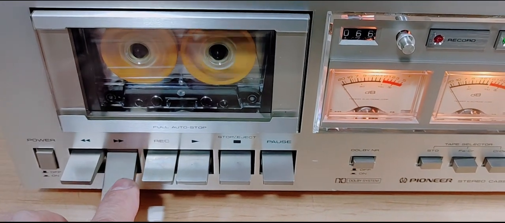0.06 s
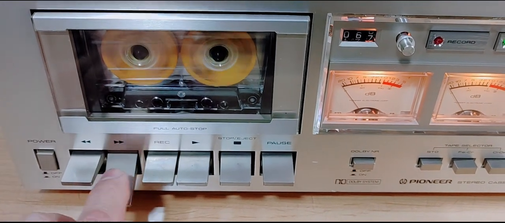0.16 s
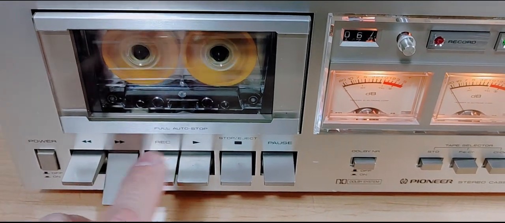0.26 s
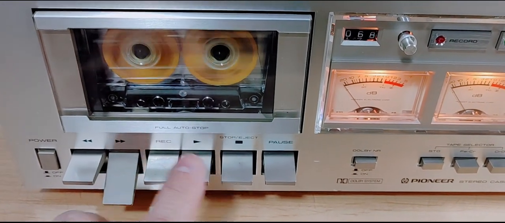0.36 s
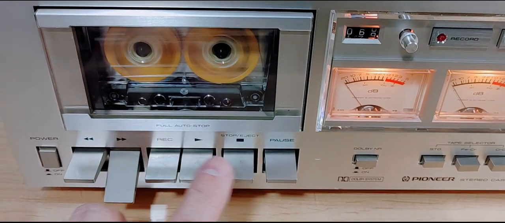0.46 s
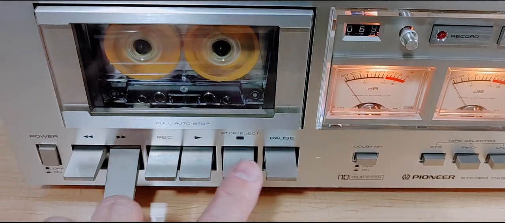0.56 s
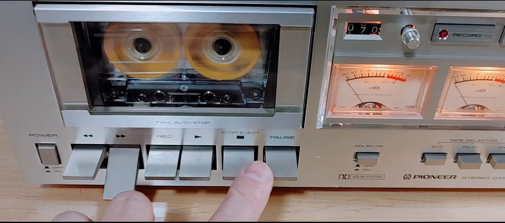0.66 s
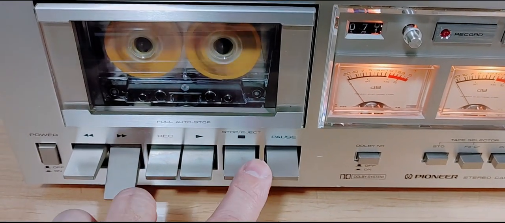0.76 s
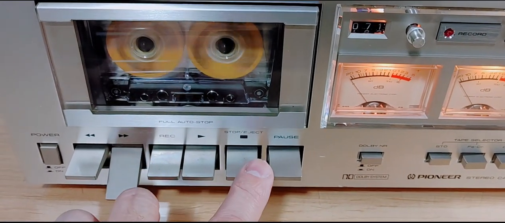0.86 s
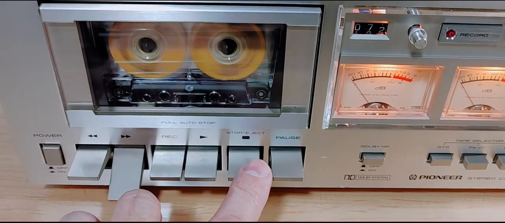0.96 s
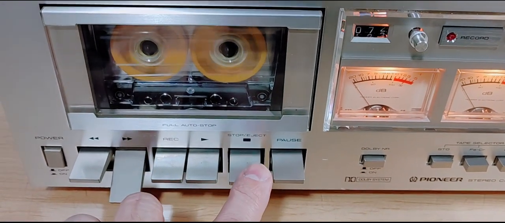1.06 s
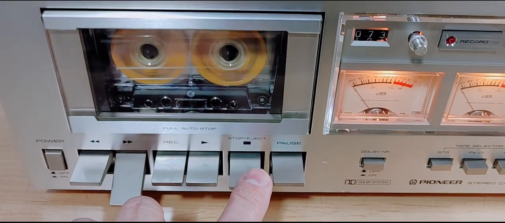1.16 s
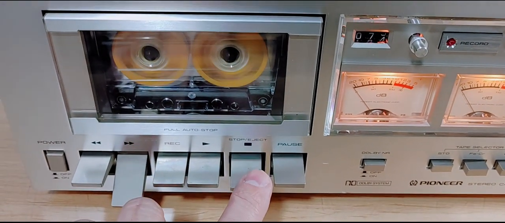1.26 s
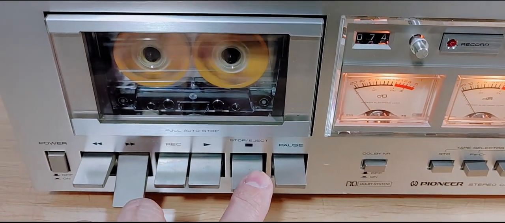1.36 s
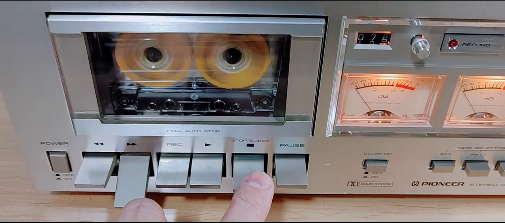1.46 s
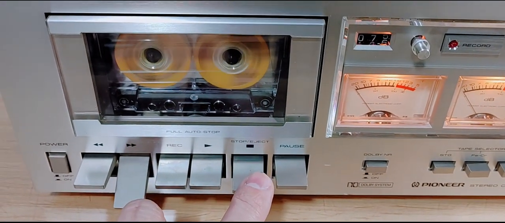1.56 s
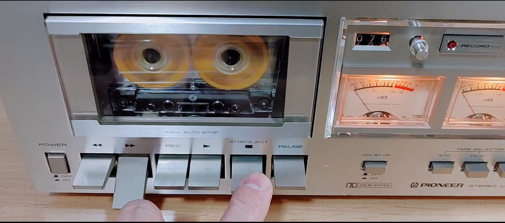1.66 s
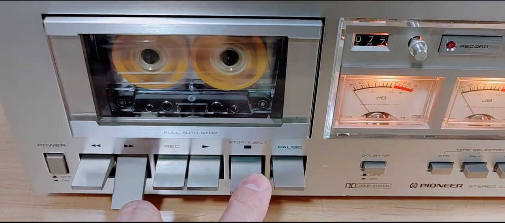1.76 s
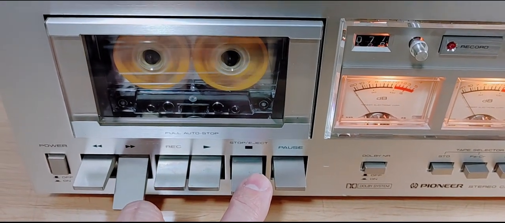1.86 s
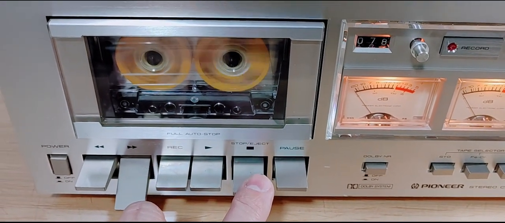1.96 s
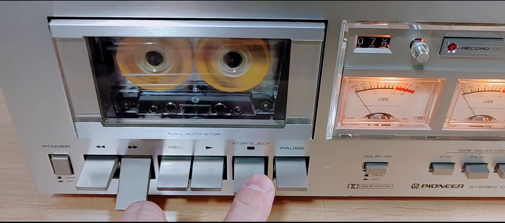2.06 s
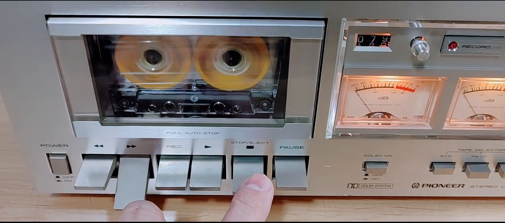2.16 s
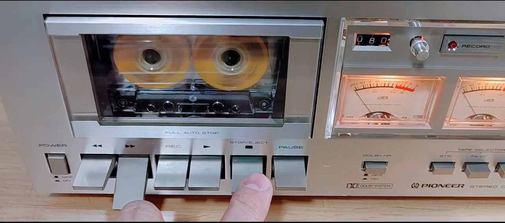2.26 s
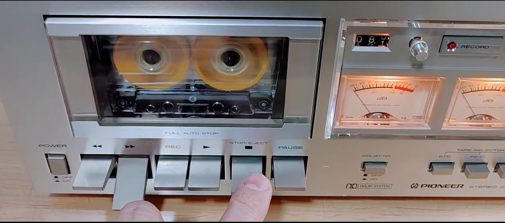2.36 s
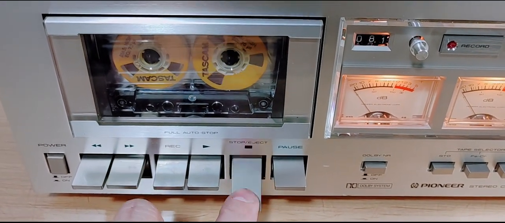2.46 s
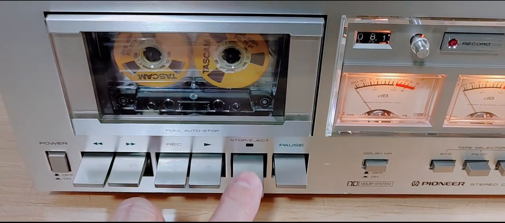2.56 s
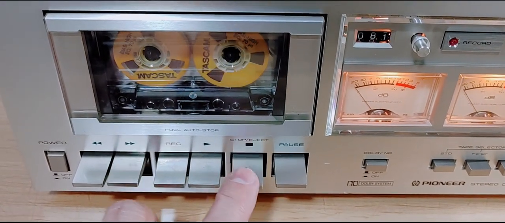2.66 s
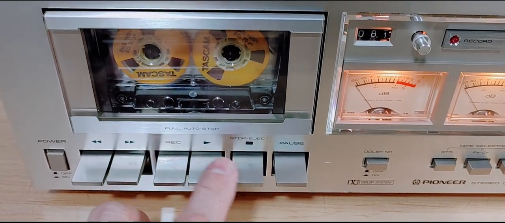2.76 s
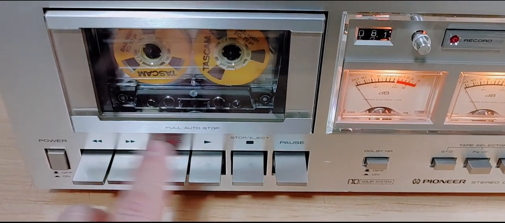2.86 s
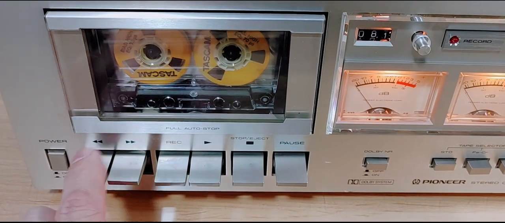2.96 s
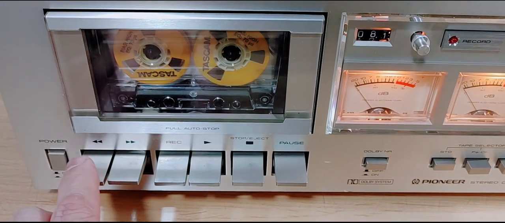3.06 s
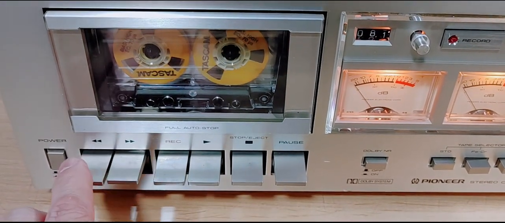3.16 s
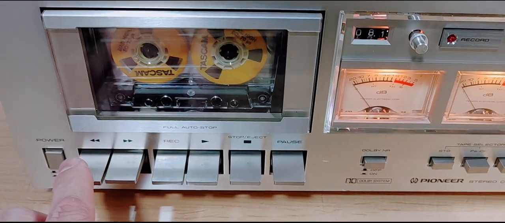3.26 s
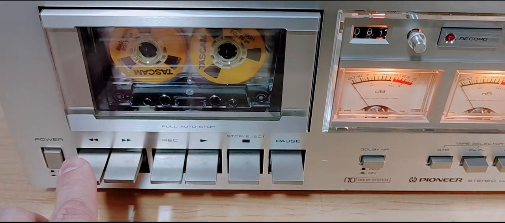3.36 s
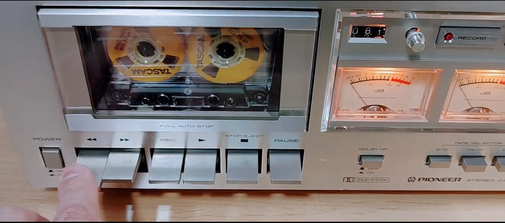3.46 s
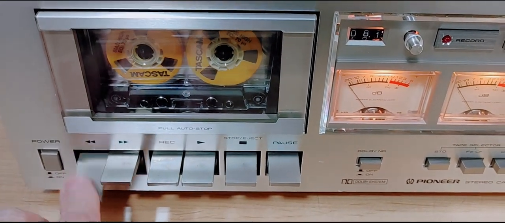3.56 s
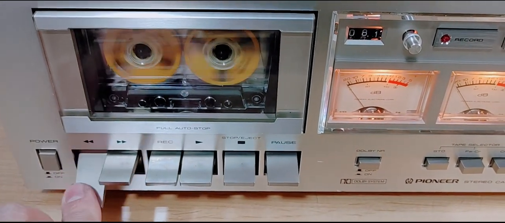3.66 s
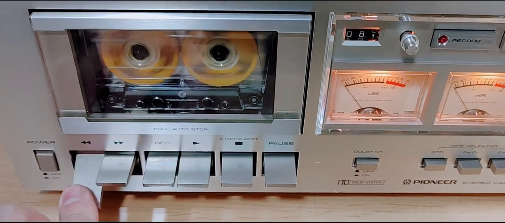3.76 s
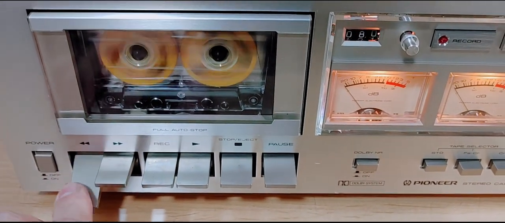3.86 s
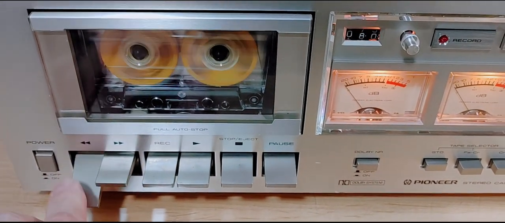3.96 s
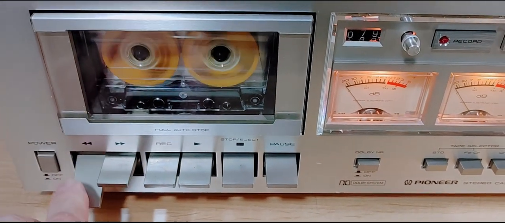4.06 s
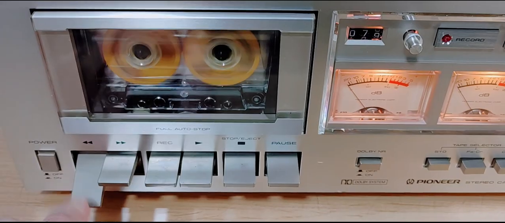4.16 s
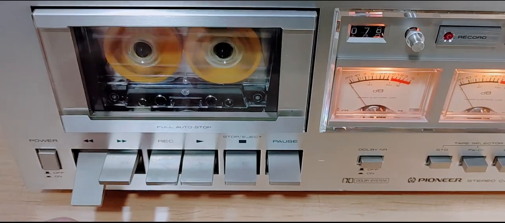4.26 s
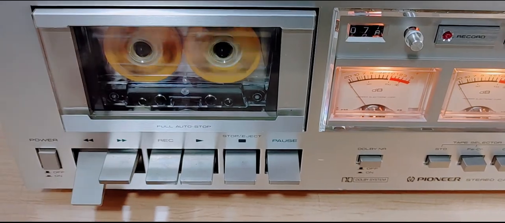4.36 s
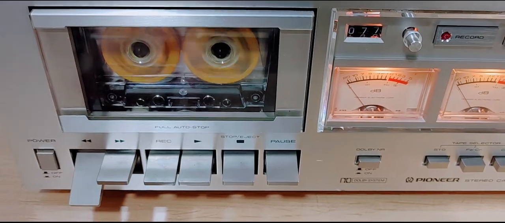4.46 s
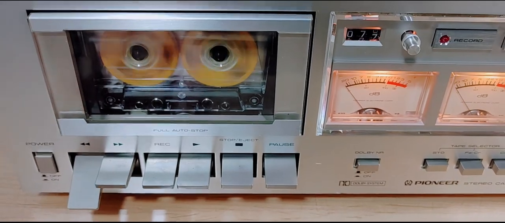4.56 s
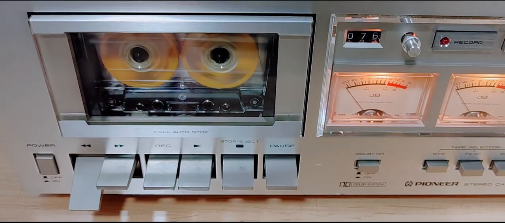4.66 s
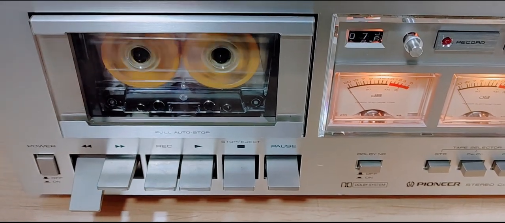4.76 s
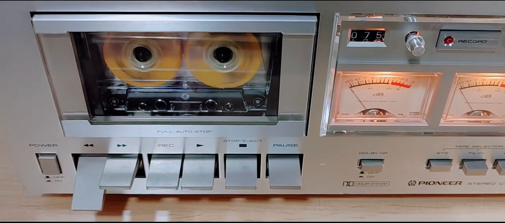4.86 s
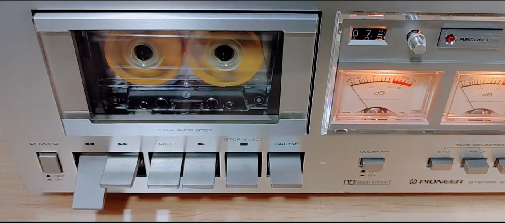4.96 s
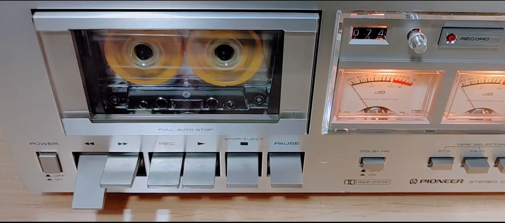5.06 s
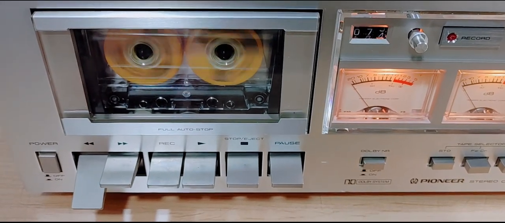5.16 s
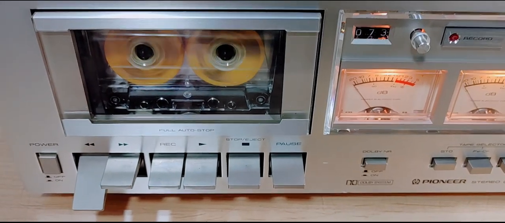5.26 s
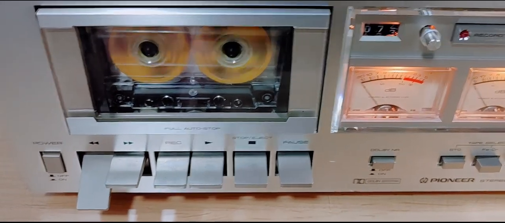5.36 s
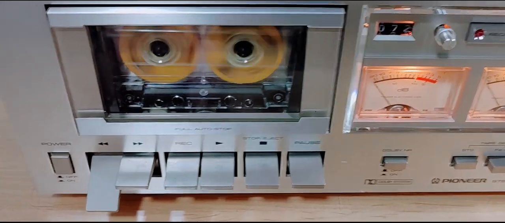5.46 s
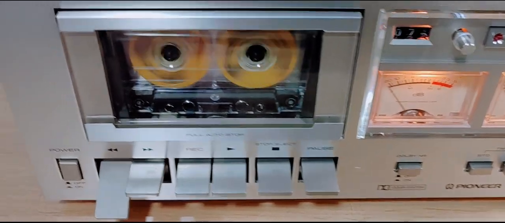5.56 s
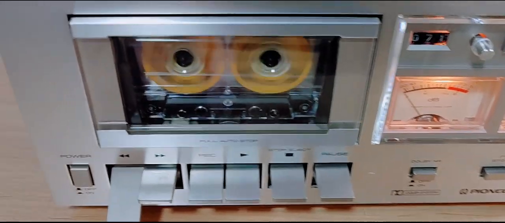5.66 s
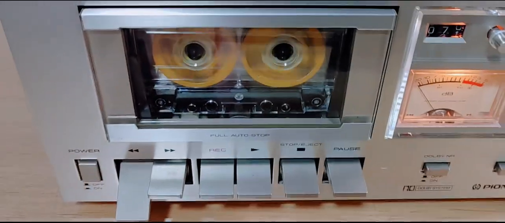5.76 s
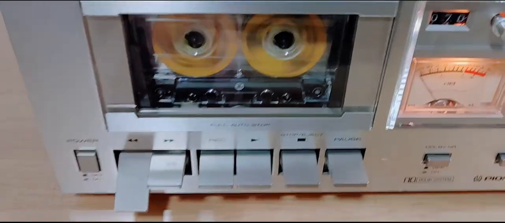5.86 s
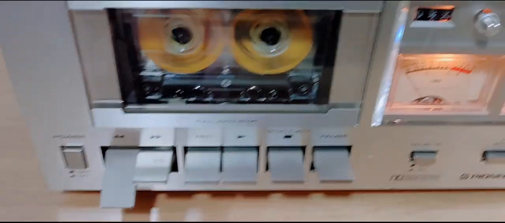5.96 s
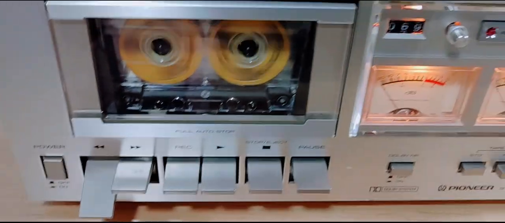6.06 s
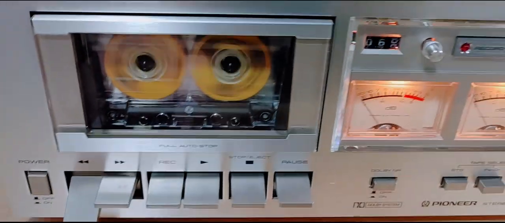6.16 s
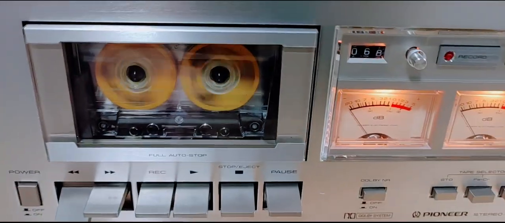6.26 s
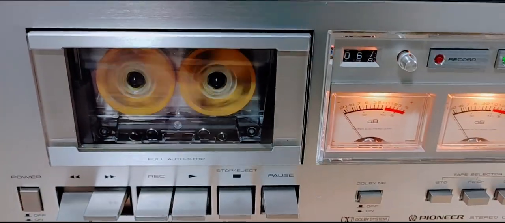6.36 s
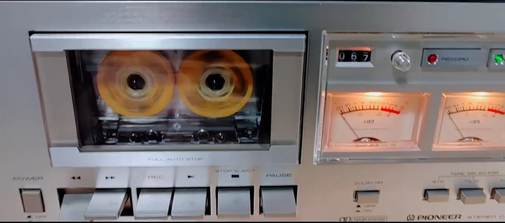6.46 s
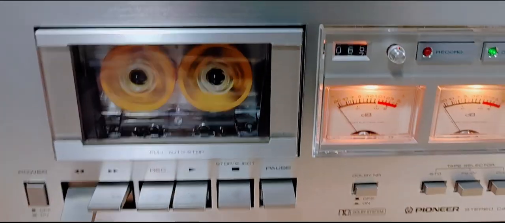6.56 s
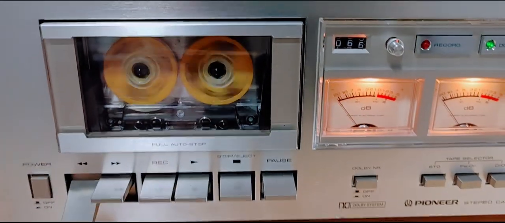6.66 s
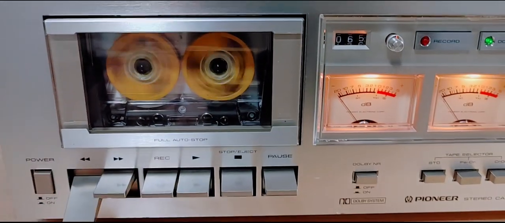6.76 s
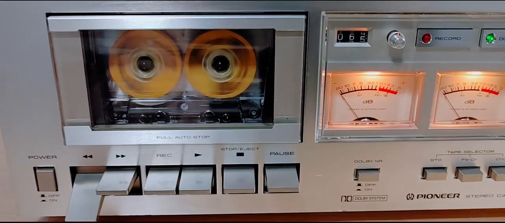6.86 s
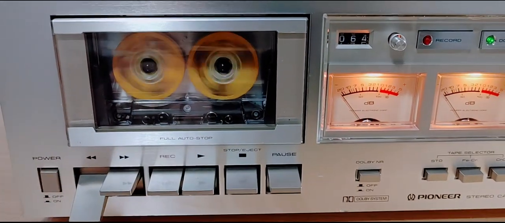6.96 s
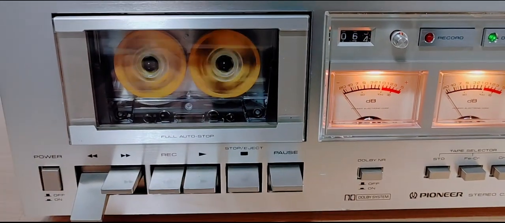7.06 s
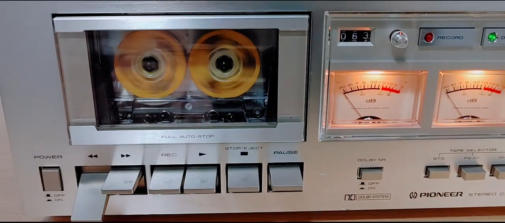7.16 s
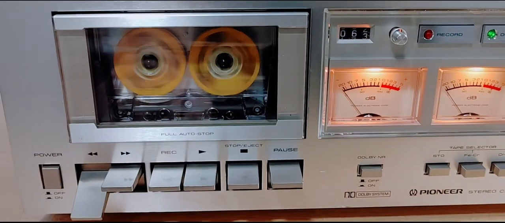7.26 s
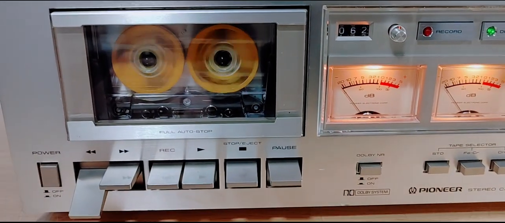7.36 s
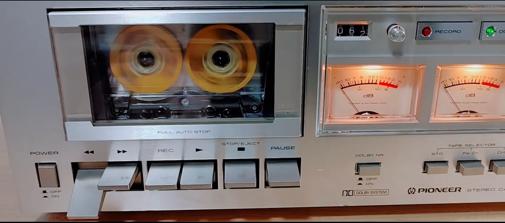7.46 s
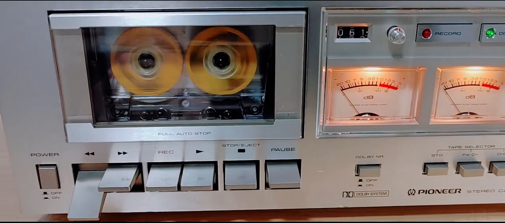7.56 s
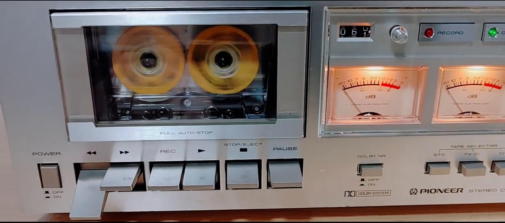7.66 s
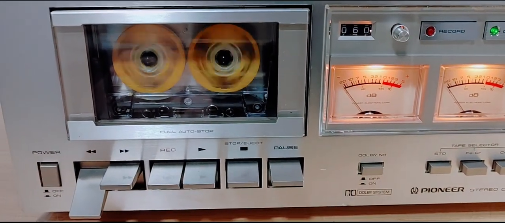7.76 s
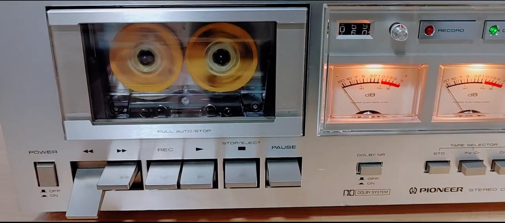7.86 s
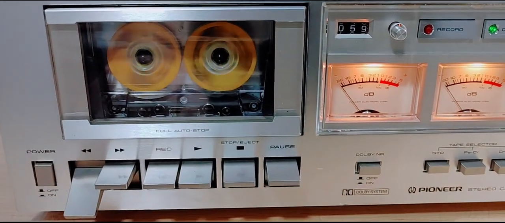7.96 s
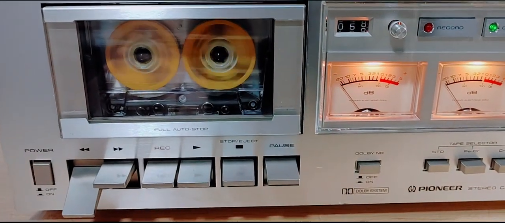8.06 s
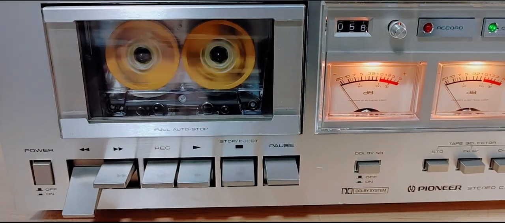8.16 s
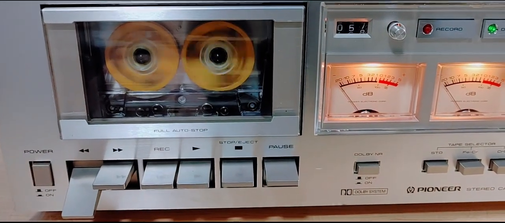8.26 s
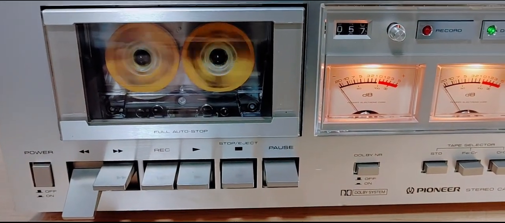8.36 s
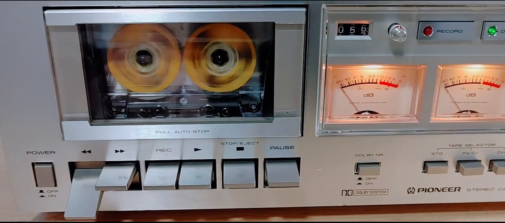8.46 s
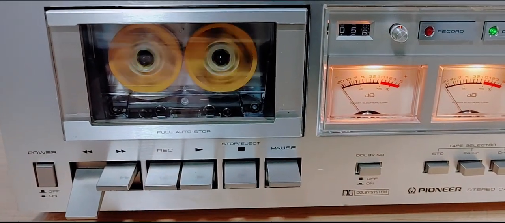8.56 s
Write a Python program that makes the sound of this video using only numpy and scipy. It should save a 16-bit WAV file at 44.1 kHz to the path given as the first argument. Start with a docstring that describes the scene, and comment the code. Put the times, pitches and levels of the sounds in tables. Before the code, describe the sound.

From 0 s a cassette deck is heard close up, already winding forward: a hollow plastic rattle pulsing about ten times a second, with hissing tape, irregular sharp ticks and a low unsteady motor hum. At about 2.43 s a very loud stop key cracks, with metal clatter, panel ring and a dull case thump; the reels halt almost at once. Small contacts follow to 2.65 s, then near silence with faint room hiss and tiny taps around 3.0 and 3.5 s. At 3.57-3.66 s a softer, looser cluster of key clicks starts rewind, spinning up by 3.8 s, with a latch click at 3.85 s. The rewind rattles about eight and a half times a second over fluttering hiss. A short dull finger rub comes at 5.4 s. From about 6.4 s the knocks grow more pronounced and the tone shifts, continuing steadily to the end at 8.6 s. Small dry room, handheld stereo microphone.

```python
"""Cassette deck winding and rewinding

A cassette deck winds forward, is stopped with a loud key clunk, then rewinds, close to a hand-held camera.
The driven hub rattles and knocks in the cassette shell at certain angles of each turn: noise and short rings.
Tape and rollers hiss and tick, the motor hums in the case: filtered noise that stops with the reels.
Keys crack and set panel and case ringing, fingers rub the camera, and a small quiet room answers.
Two microphone ports a few centimetres apart hear it all."""
import sys
import numpy as np
from scipy import signal
from scipy.fft import rfft, irfft, next_fast_len
from scipy.io import wavfile
from scipy.ndimage import map_coordinates

SR = 44100
rng = np.random.default_rng(int(sys.argv[2]) if len(sys.argv) > 2 else 0)


def dump(signal):
    """Clip the signal to [-1, 1] and save it as 16-bit WAV at the path in sys.argv[1]."""
    limited = np.clip(np.atleast_2d(signal).T, -1, 1)
    pcm = np.round(limited * 32767).astype(np.int16)
    wavfile.write(sys.argv[1], SR, pcm)


N = 379701

FORWARD_TURNS, REWIND_TURNS = 10.37, 8.5  # hub turns a second
STOP_S, START_S = 2.43, 3.6  # the reels stop under the stop key and start again under the rewind key
SPIN_UP_S = 0.21

# which colour of the deck is heard: start_s, state (0 forward, 1 rewind, 2 rewind with the camera turned)
DECK_STATE = [(2.5, 0.25), (3.5, 1), (6.0, 0.89), (6.5, 2)]
# hub looseness over one rewind turn: share_of_turn, level_db
REWIND_LOOSENESS = [(0, -12.5), (0.421, -5), (0.511, 3.5), (.6, 0.5), (.7, 6), (.86, 5), (1, -7.5)]
# knocks of the hub against the shell: start_s, late_share_of_turn, first_knock_db, last_knock_db
HUB_KNOCKS = [(0, -0.035, -49, -44), (1, 0.039, -49, -45), (2.3, -.03, -43.5, -46), (4, .01, -41, -33),
              (5.1, .025, -31, -31), (6.1, -.021, -40, -32), (6.5, -.021, -21.5, -31),
              (7.3, .001, -28.5, -29), (8.6, .021, -28.5, -35)]
# tone colour of the snaps and of the noise swells before them: pitch_hz, level_db
CLICK_COLOUR = [(590, -30), (1000, 1.5), (2990, -6), (3990, -8), (7510, -14), (10300, -9.5), (15700, -12.5)]


def amp(db):
    """Decibels as a plain multiplier."""
    return 10 ** (np.asarray(db) / 20)


def unit(x):
    """The same sound at an average (rms) level of 1."""
    return x / np.sqrt(np.mean(x ** 2) + 1e-20)


def along(points, hz):
    """Reads (Hz, value) points on a log pitch axis."""
    f, v = np.transpose(points)
    return np.interp(np.log(hz + 1), np.log(f + 1), v)


def coloured(x, points):
    """A sound whose tone follows (Hz, dB) points."""
    return filtered(x, lambda hz: amp(along(points, hz)))


def curve(rows, column, at=None):
    """One column of a table read at each sample, or at other positions."""
    rows = np.array(rows)
    positions = np.arange(N) / SR if at is None else at
    return np.interp(positions, rows[:, 0], rows[:, column])


def wobble(rate):
    """A smooth random curve, rate knots a second."""
    knots = rng.standard_normal(int(N * rate / SR) + 4)
    return map_coordinates(knots, [np.arange(N) * rate / SR])


def filtered(x, response):
    """A sound passed through a complex response of frequency."""
    m = next_fast_len(N + SR // 2)
    hz = np.fft.rfftfreq(m, 1 / SR)
    return irfft(rfft(x, m) * response(hz), m)[..., :N]


def ports(pair):
    """Two unrelated sounds shared out so that the ports agree in the bass and differ in the treble."""
    # how alike the two ports hear: pitch_hz, likeness (1 is the same)
    likeness = [(40, 0.71), (150, .92), (1000, 0.83), (2000, 0.052), (5000, 0.033)]

    def mix(hz):
        angle = np.arccos(np.clip(along(likeness, hz), 0, 1)) / 2
        return np.array([np.cos(angle), np.sin(angle)])

    mid, side = filtered(pair, mix)
    return np.array([mid + side, mid - side])


def swell_and_fade(rise, fall):
    """Outline of one contact, rise and fall in seconds: it swells in, then dies away."""
    t = np.arange(round(8 * (rise + fall) * SR)) / SR
    return t, (1 - np.exp(-(t / rise) ** 2)) * np.exp(-t / fall)


def rung(force, modes, own_db=0):
    """A force rings steep resonances; levels follow the state of the deck, and each may flicker alone."""
    state, out = curve(DECK_STATE, column=1), 0
    for hz, width_hz, *db in modes:
        level = amp(np.interp(state, range(len(db)), db) + own_db * wobble(60))
        peak = signal.iirpeak(hz, hz / width_hz / 2, SR)
        once = signal.lfilter(*peak, force * level)
        out = out + signal.lfilter(*peak, once)
    return out


def struck(events, modes, rise, fall, scatter_db, order=2):
    """Each (s, dB) contact sets all modes ringing at new strengths; the rings swell and fade together."""
    out = np.zeros((2, N + SR))
    t, shape = swell_and_fade(rise, fall)
    hz = np.array([m[0] for m in modes])
    levels = np.array([m[order:] for m in modes])  # level columns start at column order
    for s, db in events:
        state = min(round(float(curve(DECK_STATE, 1, s))), levels.shape[1] - 1)
        size = amp(db + levels[:, state] + rng.normal(0, scatter_db, len(hz)))
        phase = rng.random((2, len(hz), 1))
        rings = np.sin(2 * np.pi * (hz[:, None] * t + phase))
        out[:, round(s * SR):][:, :len(t)] += shape * np.einsum("m,cmt->ct", size, rings)
    return out[:, :N]


def bursts(times, levels_db, rise, fall):
    """A scuff of noise, different in each of two channels, at each time."""
    out = np.zeros((2, N + SR))
    t, shape = swell_and_fade(rise, fall)
    for s, db in zip(times, levels_db):
        out[:, round(s * SR):][:, :len(t)] += amp(db) * shape * rng.standard_normal((2, len(t)))
    return out[:, :N]


def turning():
    """1 while the reels turn, 0 at rest: they coast to a stop and spin up again."""
    t, coast_s = np.arange(N) / SR, 0.043
    stopping = 1 - (t - STOP_S) / coast_s
    starting = (t - START_S) / SPIN_UP_S
    return np.clip(np.maximum(stopping, starting), 0, 1)


def running(column):
    """Loudness of one part of the transport, silent when the reels rest."""
    # relative loudness while the reels turn: start_s, hub_rattle_db, tape_hiss_db
    winding_levels = [(0, -55, -60), (1.6, -54.5, -58.5), (2.4, -58, -58.5), (3.7, -60.5, -62.5),
                      (4.1, -53.5, -60.5), (6.1, -51, -56.5), (6.5, -49, -59), (8.6, -49.5, -57)]
    return turning() * amp(curve(winding_levels, column))


def per_turn(forward, rewind):
    """Level in dB of a pattern that repeats with each turn of the driven hub."""
    t, late = np.arange(N) / SR, curve(HUB_KNOCKS, column=1)
    forward_db = curve(forward, 1, (t * FORWARD_TURNS - late) % 1)
    rewind_db = curve(rewind, 1, (t * REWIND_TURNS - late) % 1)
    return np.where(t < START_S, forward_db, rewind_db)


def still_room():
    """Faint air and microphone hiss as shaped noise, plus a few wavering tones at fixed pitches."""
    # tone colour of the still room: pitch_hz, relative_level_db
    air_colour = [(27, -15.5), (123, -11), (254, -5.5), (1030, -19.5), (1820, -20), (7580, -34.5),
                  (15700, -25)]
    # steady-pitched tones in the room: pitch_hz, level_db
    room_tones = [(355.3, -80.5), (457.6, -77)]
    t = np.arange(N) / SR
    breath = amp(1.3 * wobble(17)) * rng.standard_normal((2, N))
    air = ports(coloured(breath, air_colour))
    tones = sum(amp(db + 2.2 * wobble(2.8)) * np.sin(2 * np.pi * hz * t) for hz, db in room_tones)
    return amp(-71.5) * unit(air) + tones


def walls(x):
    """The room's answer is a noise tail in which each frequency dies at its own speed."""
    # how long the echo takes to fall by 60 dB: pitch_hz, fall_s
    echo_times = [(200, 0.5), (1000, 0.37), (5000, 0.3)]
    hz, t, z = signal.stft(rng.standard_normal((2, SR // 2)), SR, nperseg=256)
    fading = z * amp(-60 * t / along(echo_times, hz)[:, None])
    tail = signal.istft(fading, SR, nperseg=256)[1]
    tail = tail / np.linalg.norm(tail[0])
    delayed = np.pad(x, ((0, 0), (300, 0)))  # samples before the answer
    return signal.fftconvolve(delayed, tail, axes=1)[:, :N]


def grip():
    """Skin drags in lumps on the camera's shell: a dull rub of noise without the deepest bass."""
    # fingers shifting on the camera: start_s, length_s, relative_level_db, rub_top_hz
    finger_rubs = [(0, 0.13, -64.5, 108), (5.41, 0.071, -46.5, 2200)]
    t, out = np.arange(N) / SR, 0
    for s, length, db, top_hz in finger_rubs:
        touch = np.clip((t - s) / 0.0026, 0, 1) * np.clip((s + length - t) / (0.5 * length), 0, 1)

        def dull(hz):
            no_deep_bass = hz ** 4 / (hz ** 4 + (top_hz / 9) ** 4)
            return no_deep_bass / (hz + 1) ** 0.14 / np.hypot(1, (hz / top_hz) ** 4)

        lumps = amp(db + 1.2 * wobble(90))
        out = out + lumps * touch * unit(filtered(rng.standard_normal((2, N)), dull))
    return ports(out)


def motor():
    """Motor, belt and flywheel rumble unevenly in the case while the tape moves: unsteady low noise."""
    # tone colour of the rumble: pitch_hz, relative_level_db
    motor_colour = [(24, -56.5), (40, -21.5), (128, -13.5), (237, -0.5), (456, -5), (699, -9), (983, -2.5),
                    (1200, -21), (2640, -120)]
    force = amp(2.1 * wobble(40) + 0.59 * wobble(10.0)) * rng.standard_normal((2, N))
    return ports(amp(-60.5) * turning() * unit(coloured(force, motor_colour)))


def ticking(roller):
    """(s, dB) of small ticks: two tape-edge snags in each forward turn, one per roller turn in rewind."""
    snag_from, snag_to = .58, 1  # share of a forward turn in which the tape edge snags
    snag_db, roller_tick_db, scatter_db = -54, -60.5, 3.5
    turn = np.repeat(np.arange(np.floor(STOP_S * FORWARD_TURNS)), 2)
    snags = (turn + rng.uniform(snag_from, snag_to, len(turn))) / FORWARD_TURNS
    pats = np.flatnonzero(np.diff(np.floor(roller + 0.085))) / SR
    pats = pats[pats > START_S + SPIN_UP_S]
    db = np.r_[np.full(len(snags), snag_db), np.full(len(pats), roller_tick_db)]
    return list(zip(np.r_[snags, pats], db + scatter_db * rng.standard_normal(len(db))))


def tape():
    """Tape rubs past the guides and snags; in rewind a roller pats it twice a turn, once harder."""
    # guide roller in rewind: start_s, turns_per_s
    roller_speed = [(4, 33.9), (6.4, 35), (8.6, 35.4)]
    # tape drag over one forward turn: share_of_turn, level_db
    forward_drag = [(0, 6), (.2, -3.5), (.6, -4.5), (.7, 7), (1, -0.5)]
    # ringing of tape path and metal chassis:
    # pitch_hz, width_hz (sets the sharpness), forward_db, rewind_db, camera_turned_db
    path_rings = [(2574, 35, 2.5, 0.5, 5), (3017, 42, 0.5, 5.5, 0.5), (3413, 78, -10, -6.5, 3),
                  (4120, 77, -6, -2, -15), (4990, 410, -4, -7.5, -2), (6200, 77, -6.5, 5.5, -0.5),
                  (6690, 230, -18, -3.5, 3.5), (7210, 87, -18, 1, -8.5), (9200, 220, -12.5, -17, -8)]
    # tone colour of the broad hiss: pitch_hz, relative_level_db
    hiss_colour = [(880, -36), (1500, -7), (2200, -15.5), (5020, -13.5), (6880, -18.5), (7970, -27),
                   (9330, -24.5), (15700, -24)]
    # the sharpest ticks in the tape path: start_s, relative_level_db
    sharp_ticks = [(0.8659, -41.5), (1.1488, -37.5), (1.6247, -36.5), (1.7404, -35.5), (1.9974, -41),
                   (4.025, -45)]
    drag_follows = 0.35  # share of the rewind rattle, in dB, that the tape drag follows
    pat_at = .62  # share of a roller turn where it pats harder
    roller = np.cumsum(curve(roller_speed, column=1)) / SR - pat_at
    pats = 2 * np.cos(2 * np.pi * roller) + 1.8 * np.cos(4 * np.pi * roller)
    pats = pats * (np.arange(N) > START_S * SR)
    drag = per_turn(forward_drag, np.multiply(REWIND_LOOSENESS, [1, drag_follows]))

    rub = amp(drag + pats + 1.5 * wobble(130)) * rng.standard_normal((2, N))
    guides = rung(rub, path_rings, own_db=4.5)
    flutter = amp(0.47 * drag + 0.43 * pats + 1.5 * wobble(45))
    broad = coloured(flutter * rng.standard_normal((2, N)), hiss_colour)
    all_ticks = sharp_ticks + ticking(roller)
    ticks = struck(all_ticks, path_rings[3:], rise=0.00053, fall=0.0027, scatter_db=4.0)
    hiss = amp(-2.5) * unit(guides) + amp(0.5) * unit(broad)
    return ports(running(column=2) * hiss + ticks)


def swells():
    """Noise swells briefly before some key cracks and stops there."""
    # the swells: end_s, length_s, first_db, last_db (relative)
    noise_swells = [(2.4374, 0.015, -35, -12), (3.578, 0.031, -66, -58), (3.853, 0.029, -59, -50)]
    t, level = np.arange(N) / SR, 0
    for end, length, first_db, last_db in noise_swells:
        level = level + amp(np.interp(t, [end - length, end], [first_db, last_db], -200, -200))
    return level * rng.standard_normal((2, N))


def crack(s, db, clatter_db):
    """A contact snaps and rings the levers; loose parts clatter after it in grains."""
    # ringing of the steel levers: pitch_hz, width_hz (sets the sharpness), level_db
    lever_rings = [(1797, 45, 5.5), (1990, 56, -2.5), (3760, 75, -7.5), (4120, 60, -2), (4330, 73, -1.5),
                   (5130, 100, -4), (5720, 110, -1.5), (6700, 100, -6.5)]
    clatter = bursts(s, 1.154 * db + clatter_db, rise=0.0028, fall=0.023) * amp(3.64 * wobble(350))
    snap = bursts(s, db, rise=0.00042, fall=0.0023) + clatter
    struck_levers = struck(zip(s, db), lever_rings, rise=0.00043, fall=0.0039, scatter_db=2.5)
    levers = struck_levers + amp(-0.5) * rung(clatter, lever_rings, own_db=5.0)
    return amp(5.5) * coloured(snap, CLICK_COLOUR) + amp(-7.0) * levers


def keys():
    """Keys, levers and latches: each contact cracks; panel and case ring longer."""
    # the contacts: start_s, crack_db, panel_db, case_db (panel and case relative to the crack)
    contacts = [(2.4385, -7, -9, -17.5), (2.4511, -17.5, 3.5, -3.5), (2.469, -21, 3.5, 0.5),
                (2.54, -39, 6.5, -11), (2.6253, -38.5, -28, -14), (2.922, -85.5, 16, 0),
                (3.0218, -58.5, -18, -15), (3.131, -70.5, -6, -8), (3.487, -56.5, -3.5, -1),
                (3.573, -31.5, -18, -26), (3.583, -39, 3, -18), (3.6001, -29.5, -5.5, -27),
                (3.617, -48.5, -3, 8), (3.636, -42.5, 4.5, 2), (3.654, -31.5, -15, -9.5),
                (3.8405, -44, -20, -14), (3.854, -49.5, 5, 12)]
    # ringing of the front panel: pitch_hz, stop_key_db, rewind_key_db
    panel_rings = [(536, -2, -11), (563.4, -2, -12), (819, -1.5, 1.5)]
    # booming of the case: pitch_hz, stop_key_db, rewind_key_db
    case_booms = [(233.2, -2.5, -1.5), (268.2, -2.5, -0.5), (350, -3.5, -5)]
    s, db, panel_db, case_db = np.transpose(contacts)
    light = s > 2.6  # seconds: contacts after the stop blow are lighter latches

    def latch_band(hz):  # a light latch cracks in one broad band around 4830 Hz
        return amp(3.5) / (1 + (hz / 4830 - 4830 / (hz + 1)) ** 2)

    def no_shudder(hz):  # the ringing is cut below about 150 Hz
        return hz ** 4 / (hz ** 4 + 150 ** 4)

    heavy_cracks = crack(s[~light], db[~light], clatter_db=-4.5)
    light_cracks = filtered(crack(s[light], db[light], clatter_db=1), latch_band)  # they rattle more
    lead_in = amp(6.5) * coloured(swells(), CLICK_COLOUR)
    panel = struck(zip(s, db + panel_db), panel_rings, rise=0.0032, fall=0.014, scatter_db=1.7, order=1)
    case = struck(zip(s, db + case_db), case_booms, rise=0.005, fall=0.016, scatter_db=1.05, order=1)
    buzz = amp(2.5 * wobble(140))
    body = filtered((panel + case) * buzz, no_shudder)
    return ports(heavy_cracks + light_cracks + lead_in + body)


def seatings():
    """(s, dB) of the knocks in every turn, where the hub meets the shell."""
    odd_turn_db, middle_db = -5, -3.5  # rewind: first knock softer every other turn; middle re the last
    scatter_db, scatter_s = 1.3, .0012
    seated_s = 3.95  # the rewind knocks turn regular
    # each knock: share of turn, level column of HUB_KNOCKS, extra dB, extra dB on odd turns
    forward = [(.6, 2, 0, 0), (.93, 3, 0, 0)]
    rewind = [(.45, 2, 0, odd_turn_db), (.675, 3, middle_db, 0), (.795, 3, 0, 0)]
    stretches = [(0, STOP_S, FORWARD_TURNS, forward), (seated_s, N / SR, REWIND_TURNS, rewind)]
    out = []
    for start, end, rate, seats in stretches:
        turn = np.arange(np.ceil(start * rate), np.floor(end * rate))
        for seat, column, extra_db, odd_db in seats:
            late, hard = rng.standard_normal((len(turn), 2)).T
            s = (turn + seat) / rate
            s = s + curve(HUB_KNOCKS, 1, s) / rate + scatter_s * late
            db = curve(HUB_KNOCKS, column, s) + extra_db + turn % 2 * odd_db + scatter_db * hard
            out += zip(s, db)
    return out


def hub():
    """The loose hub chatters against the shell, hardest at certain angles of each turn, and knocks it."""
    # hub looseness over one forward turn: share_of_turn, level_db
    forward_looseness = [(0, 2.5), (.15, -7.5), (.35, -6), (.65, 3), (.8, -7), (1, 5)]
    # ringing of cassette shell and window:
    # pitch_hz, width_hz (sets the sharpness), forward_db, rewind_db, camera_turned_db
    shell_rings = [(804, 52, -2, -22, -26.5), (967, 68, -25, -16.5, -15), (1020, 36, 6.5, -21, -23.5),
                   (1414.4, 43, 2, 2.5, 1.5), (1636, 51, -25.5, -8.5, -1), (1835, 64, -8.5, -13.5, -32),
                   (2044, 24, -8, -8, -17)]
    # extra single knocks, and a sharp tick at 2.112 s, all ringing the shell: start_s, relative_level_db
    single_knocks = [(0.082, -34), (0.278, -32), (0.377, -34), (0.671, -35.5), (1.539, -30.5), (1.601, -32),
                     (1.699, -36.5), (2.112, -28), (3.848, -40), (3.915, -38), (4.078, -29), (7.131, -30)]
    chatter = amp(per_turn(forward_looseness, REWIND_LOOSENESS) + 3.2 * wobble(80))
    force = chatter * rng.standard_normal((2, N))
    all_knocks = seatings() + single_knocks
    knocks = struck(all_knocks, shell_rings, rise=0.005, fall=0.0041, scatter_db=2.0)
    rattle = running(column=1) * unit(rung(force, shell_rings, own_db=4.0))
    return ports(rattle + knocks)


def scene():
    """The winding deck and its key blows, their answer from the room, the camera grip and the still room."""
    # half of left minus right for the driven hub, one value per deck state: pan_db
    hub_pan_db = [-0.04, -2, -2]
    pan = np.interp(curve(DECK_STATE, column=1), range(len(hub_pan_db)), hub_pan_db)
    winding = hub() * amp([pan, -pan]) + tape() + motor()
    blows = keys()
    echo = walls(amp(-11.5) * winding + amp(-11.0) * blows)
    return winding + blows + echo + grip() + still_room()


def record(dry):
    """The ports differ in colour and arrival time; nothing is kept above the band limit."""
    # colour difference of the ports: pitch_hz, left_minus_right_db
    port_lean = [(60, 0), (550, 1.5), (1650, -2.5), (4970, -1.5), (15000, 3.5)]
    lag_s = 6 / SR  # the right port hears later
    top_hz, edge_hz = 15800, 150  # middle and width of the fall at the band limit

    def response(hz):
        left = amp(along(port_lean, hz) / 2) * np.exp(1j * np.pi * hz * lag_s)
        band = np.clip((top_hz - hz) / edge_hz + .5, 0, 1) ** 2
        return np.array([left, 1 / left]) * band

    return filtered(dry, response)


dry = scene()
out = record(dry)
dump(out)
```